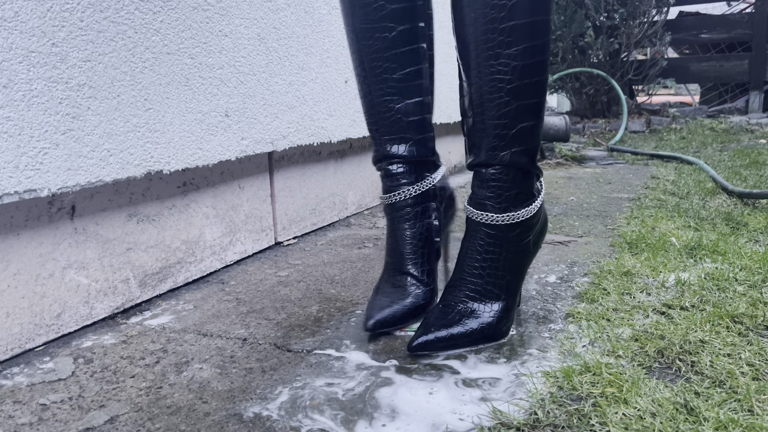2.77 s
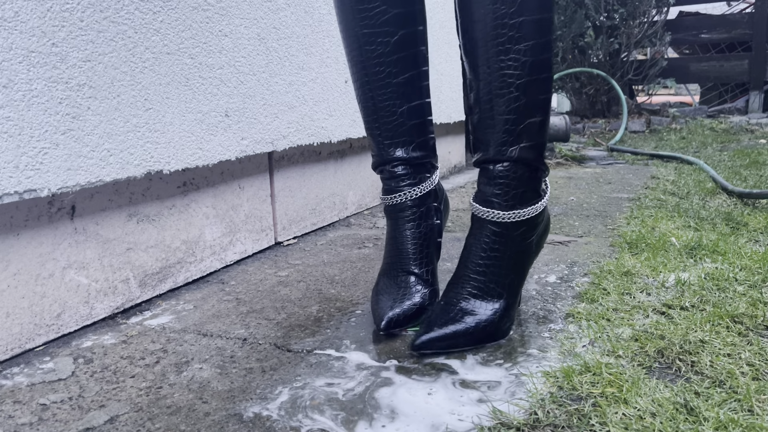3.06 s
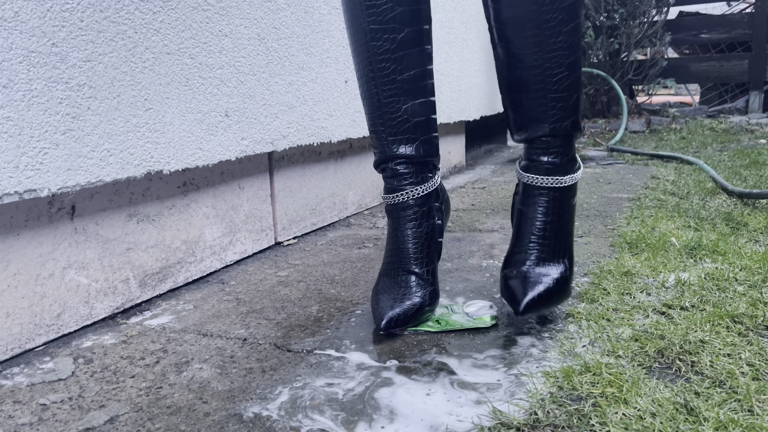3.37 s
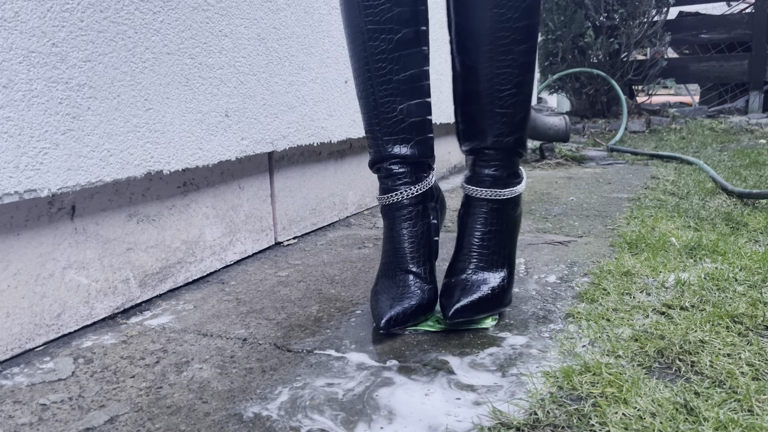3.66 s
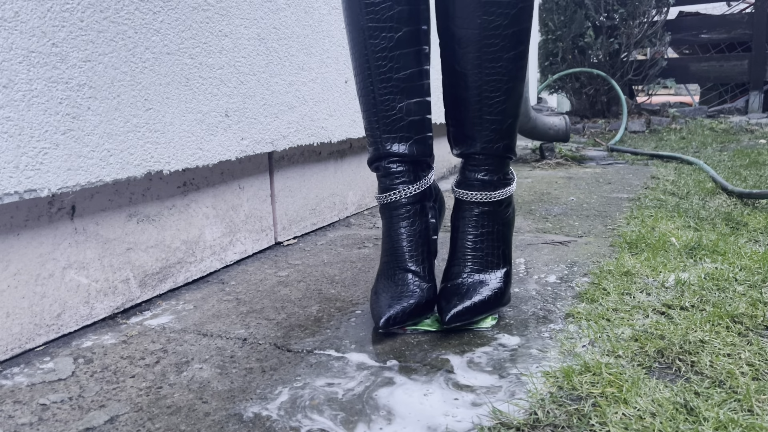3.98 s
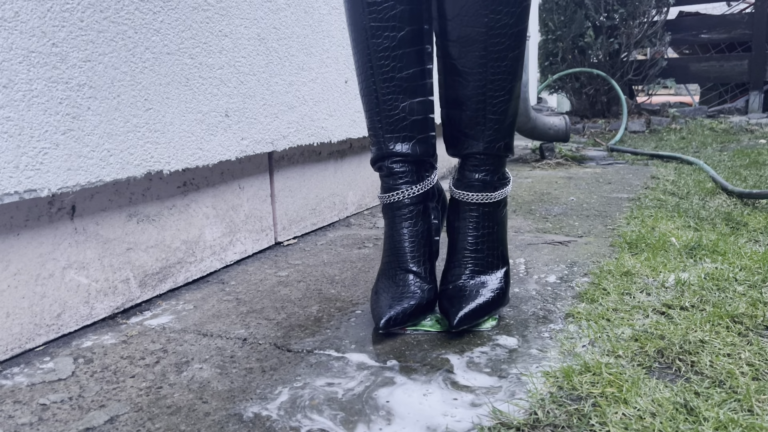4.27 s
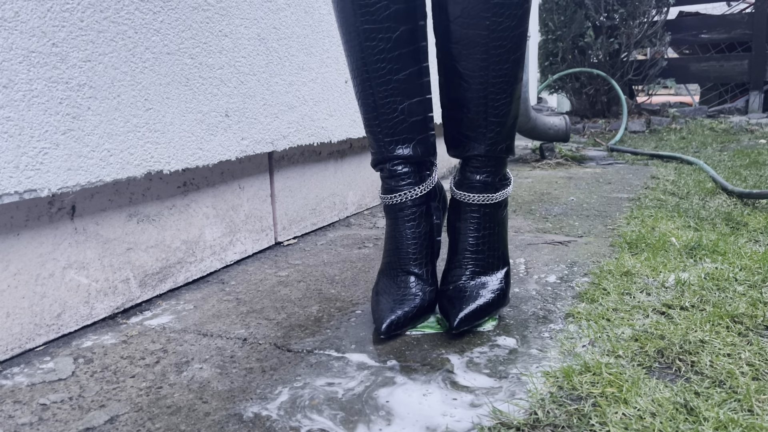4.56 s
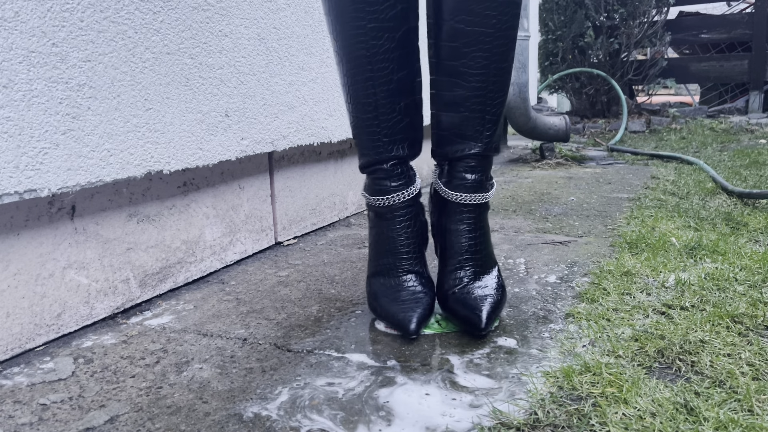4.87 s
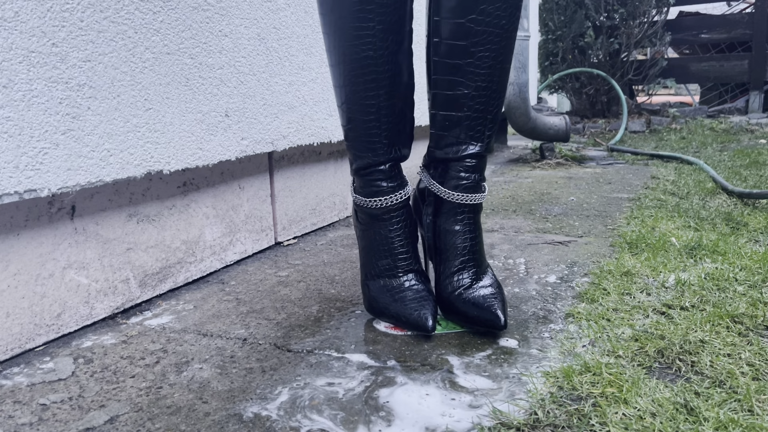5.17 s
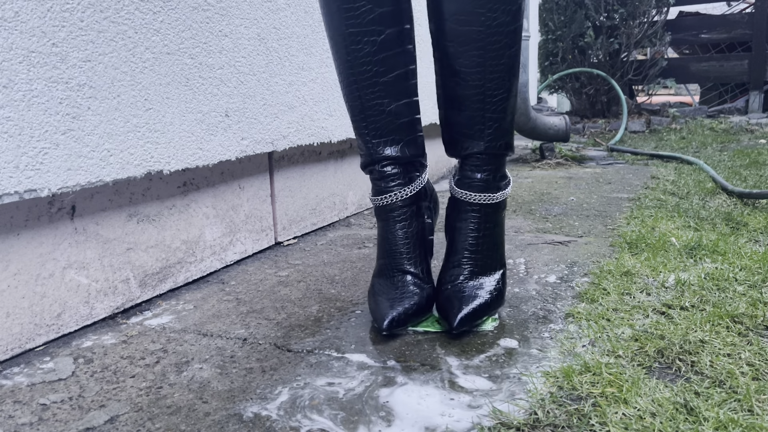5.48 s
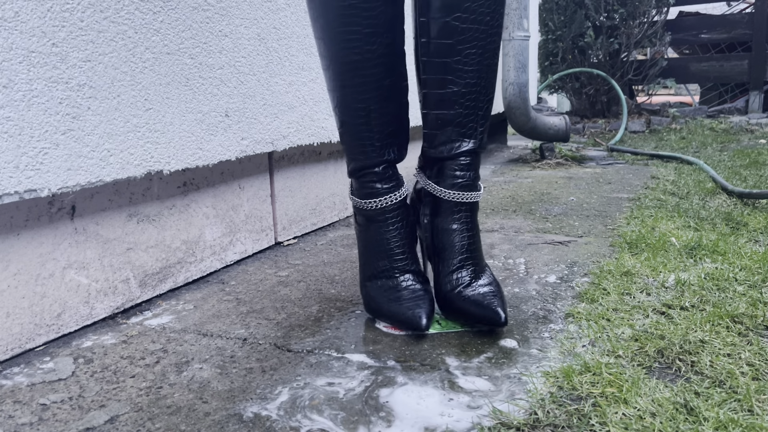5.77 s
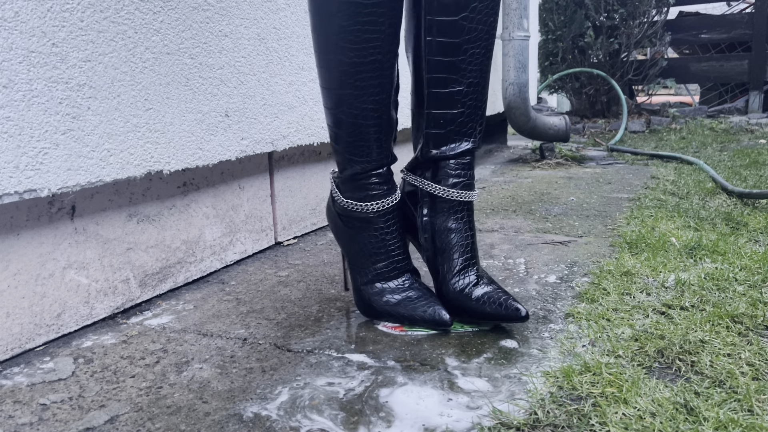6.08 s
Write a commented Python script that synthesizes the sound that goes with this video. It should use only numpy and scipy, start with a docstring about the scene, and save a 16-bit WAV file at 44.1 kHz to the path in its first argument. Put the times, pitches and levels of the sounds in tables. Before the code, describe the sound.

Busy metallic crunches and crackles of a thin can underfoot on wet ground thin out into sparse clicks and faint scrapes over low outdoor rumble.

```python
"""Concrete ground beside a house wall: high-heeled boots tread a flattened thin metal can into the wet.
Decaying sine modes and noise bursts make the snaps of the buckling sheet; damped sines make the knocks.
Shaped, grainy noise makes the crumpling, the scrape over wet grit, the rasp of slips and the foam's fizz.
Noise rumble and a wavering low rush lie below; noise tails answer the hits; a two-port microphone listens."""
import sys
import numpy as np
from scipy import signal
from scipy.fft import rfft, irfft, next_fast_len
from scipy.io import wavfile
from scipy.ndimage import uniform_filter1d, map_coordinates

SR = 44100
rng = np.random.default_rng(int(sys.argv[2]) if len(sys.argv) > 2 else 0)


def dump_mix(stems):
    """Bounce the given channels to the path in sys.argv[1] as a 16-bit WAV at rate SR."""
    frames = np.atleast_2d(stems).T  # one column per channel
    limited = np.clip(frames, -1, 1)  # hard clip at full scale
    pcm = np.round(limited * 32767).astype(np.int16)
    wavfile.write(sys.argv[1], SR, pcm)


N = 274743


def amp(db):
    """Decibels to gain."""
    return 10 ** (np.asarray(db) / 20)


def unit(x):
    """x at rms 1."""
    return x / np.sqrt(np.mean(x ** 2) + 1e-20)


def along(points, hz):
    """Second column of points, interpolated over log frequency."""
    point_hz, value = np.transpose(points)
    return np.interp(np.log(hz + 1), np.log(point_hz + 1), value)


def curves(rows):
    """One value per sample for each column after the time."""
    time_s, *columns = np.transpose(rows)
    return [np.interp(np.arange(N) / SR, time_s, column) for column in columns]


def wobble(rate_hz):
    """Smooth random curve with rate_hz knots a second."""
    knots = rng.standard_normal(int(N * rate_hz / SR) + 4)
    return map_coordinates(knots, [np.arange(N) * rate_hz / SR])


def filtered(x, response):
    """x times a complex response of frequency."""
    n = x.shape[-1]
    size = next_fast_len(n + SR // 4)
    spectrum = rfft(x, size) * response(np.fft.rfftfreq(size, 1 / SR))
    return irfft(spectrum, size)[..., :n]


def causal(spectrum, size=1024):
    """Minimum-phase impulse response of a spectrum, by folding its cepstrum."""
    level_db = along(spectrum, np.fft.rfftfreq(size, 1 / SR))
    cepstrum = irfft(np.log(amp(level_db)))
    cepstrum[1:size // 2] *= 2
    cepstrum[size // 2 + 1:] = 0
    return irfft(np.exp(rfft(cepstrum)))


# left-right likeness: (frequency [Hz], correlation [0-1])
LIKENESS = [(40, .99), (120, .96), (250, .68), (600, .25), (1000, .2), (5000, .55), (8000, .97), (9300, 1)]


def spread(pair):
    """Two unrelated signals become left and right, alike by frequency."""
    def mid_side_gains(hz):
        turn_rad = np.arccos(np.clip(along(LIKENESS, hz), 0, 1)) / 2
        return np.array([np.cos(turn_rad), np.sin(turn_rad)])

    mid, side = filtered(pair, mid_side_gains)
    return np.array([mid + side, mid - side])


def noise(spectrum, grain_db=0, grain_hz=100):
    """Stereo noise of rms 1; a random level of deviation grain_db clumps it into grains."""
    pair = rng.standard_normal((2, N)) * amp(grain_db * wobble(grain_hz))
    return unit(spread(filtered(pair, lambda hz: amp(along(spectrum, hz)))))


def swept(x, path, peak_db, octaves, patchy_db):
    """x through a broad resonance that follows path, with small random patches."""
    hz, frame_s, z = signal.stft(x, SR, nperseg=1024)
    centre_hz = np.interp(frame_s, *np.transpose(path))
    away = np.log2((hz[:, None] + 1) / centre_hz) / octaves
    patches = uniform_filter1d(rng.standard_normal(z.shape[1:]), 3, 0)
    patches = unit(uniform_filter1d(patches, 7, 1))
    coloured = z * amp(peak_db / (1 + away ** 2) + patchy_db * patches)

    def slow_power(v):
        return uniform_filter1d(np.sum(np.abs(v) ** 2, axis=(0, 1)), 15)

    # the colour moves, the slow level stays
    coloured *= np.sqrt(slow_power(z) / slow_power(coloured))
    return signal.istft(coloured, SR, nperseg=1024)[1][:, :N]


def add(track, time_s, sound):
    """Mix a sound into the track at time_s."""
    room = track[max(0, round(time_s * SR)):][:len(sound)]
    room += sound[:len(room)]


# rumble spectrum: (frequency [Hz], relative density [dB])
RUMBLE = [(15, -43.5), (28, -33), (45, -3), (70, 2.5), (105, 1.5), (140, -10), (200, -15.5), (400, -58)]
# low rush spectrum: (frequency [Hz], relative density [dB])
RUSH = [(90, -20.5), (160, -1), (240, -2), (320, -10), (450, -11.5), (620, -25), (1200, -42), (4000, -63.5)]
# rush resonance: (time [s], centre [Hz])
RUSH_COLOUR = [(0, 168), (1.3, 201.6), (1.75, 408), (2.3, 262), (2.9, 343), (3.4, 420), (4.0, 384),
               (4.3, 189.5), (4.9, 289.6), (5.1, 247), (5.6, 190)]
# rush swell, before rush_trim_db: (time [s], level [dB])
RUSH_LEVEL = [(0, -61.5), (.45, -59), (.75, -59.5), (1.28, -60.5), (1.7, -54.5), (2.25, -57.5),
              (2.62, -57.5), (2.87, -54.5), (3.12, -60.5), (3.4, -54.5), (3.6, -60), (3.92, -54),
              (4.75, -57.5), (5.05, -50), (5.35, -59), (6.23, -57)]


def air(rumble_db=-49, drift_db=0.26, rush_trim_db=3):
    """Distant rumble that drifts a little, and a low rush that swells, sinks and wavers in colour."""
    rumble = amp(rumble_db + drift_db * wobble(4)) * noise(RUMBLE)
    rush_db, = curves(RUSH_LEVEL)
    rush = swept(noise(RUSH), RUSH_COLOUR, peak_db=3.5, octaves=0.26, patchy_db=2.22)
    return rumble + amp(rush_db + rush_trim_db) * rush


# far decay of the yard: (frequency [Hz], t60 [s])
YARD_T60 = [(100, 0.24), (500, 0.18), (1500, 0.27), (5000, 0.32), (12000, .2)]


def yard(hits, near_db=-13, near_t60_s=0.057, far_db=-15, stretches=12):
    """Ground and wall scatter hits at once, the yard answers longer; each stretch draws new paths."""
    wet, t = np.zeros((2, N)), np.arange(SR // 3) / SR
    for stretch in np.array_split(np.arange(N), stretches):
        hz, age_s, z = signal.stft(rng.standard_normal((2, len(t))), SR, nperseg=256)
        z = z * amp(-60 * age_s / along(YARD_T60, hz)[:, None])
        far = signal.istft(z, SR, nperseg=256)[1][:, :len(t)]
        near = rng.standard_normal((2, len(t))) * amp(-60 * t / near_t60_s)
        both = amp(near_db) * unit(near) + amp(far_db) * unit(far)
        tail = spread(both / np.sqrt(len(t)))
        answers = signal.fftconvolve(hits[stretch][None], tail, axes=1)
        for side, answer in zip(wet, answers):
            add(side, stretch[0] / SR + .001, answer)
    return wet


# can gives way, before grinding trims:
# (time [s], crumple [dB], scrape [dB], wet fizz [dB], build-up [s])
CRUSHES = [(.472, -47, -53, -50.5, .008), (.548, -57, -51.5, -45.5, .018), (1.0, -41.5, -45.5, -47, .025),
           (1.412, -39, -43.5, -46, .014), (1.785, -54, -56, -53, .02), (1.59, -55, -71, -69, .008),
           (1.912, -44, -61, -54, .008), (2.03, -51, -56, -57.5, .018), (2.225, -38.5, -45, -53.5, .014),
           (2.28, -39, -42.5, -47, .014), (2.465, -45, -42.5, -53.5, .025), (3.176, -53, -63, -78, .01),
           (3.695, -41, -47, -46, .005), (4.53, -53, -55, -74, .011), (5.705, -61.5, -62, -61, .03)]
CRUSH_DB_PER_S = 301  # fall of the crunch
# lingering crumple, scrape and fizz, relative to the crush [dB]; their fall
SETTLE_DB, SETTLE_DB_PER_S = [-26.5, -29, -21.5], 60
# sole swivels, before grinding trims: (time [s], scrape [dB], wet fizz [dB], half length [s])
RUBS = [(0.037, -68, -68, .06), (0.189, -79, -70, .08), (.64, -59, -60, .045), (0.879, -75, -71, .06),
        (1.185, -77, -62, .07), (1.499, -64, -74, .035), (1.72, -70, -73, .03), (2.179, -66, -66, .03),
        (2.37, -61, -62, .035), (2.782, -68, -65, .06), (2.921, -76, -79, .04), (3.178, -70, -71.5, .06),
        (3.401, -78, -76, .1), (3.83, -63, -58, .04), (4.05, -73, -75, .12), (4.601, -68, -68.5, .03),
        (4.784, -72, -65.5, .04), (4.97, -63, -62, .055), (5.465, -60, -59.5, .04), (5.791, -67, -70, .055),
        (5.983, -63, -64.5, .05), (6.177, -61, -66, .018)]
RUB_CRUMPLE_DB = 1  # relative to the rub's scrape
# standing weight, before grinding trims: (crumple [dB], scrape [dB], fizz [dB])
REST_DB = [-70, -76, -76]


def effort():
    """Gains of crumple, scrape and fizz: a crush builds, collapses and settles; a rub swells and fades."""
    t = np.arange(N) / SR
    power = np.outer(amp(REST_DB) ** 2, np.ones(N))
    for time_s, crumple_db, scrape_db, fizz_db, rise_s in CRUSHES:
        build = np.exp(-(np.minimum(t - time_s, 0) / rise_s) ** 2)
        age_s = np.maximum(t - time_s, 0)
        peak = amp([crumple_db, scrape_db, fizz_db])
        power += np.outer(peak ** 2, build * amp(-CRUSH_DB_PER_S * age_s) ** 2)
        settled = peak * amp(SETTLE_DB)
        power += np.outer(settled ** 2, build * amp(-SETTLE_DB_PER_S * age_s) ** 2)
    for time_s, scrape_db, fizz_db, half_s in RUBS:
        peak = amp([scrape_db + RUB_CRUMPLE_DB, scrape_db, fizz_db])
        power += np.outer(peak ** 2, np.exp(-((t - time_s) / half_s) ** 2))
    return np.sqrt(power)


# fold spectrum: (frequency [Hz], relative density [dB])
CRUMPLE = [(150, -37.5), (400, 3), (700, -1.5), (1200, -4.5), (1800, -13), (3000, -25), (6000, -65)]
# metal on grit spectrum: (frequency [Hz], relative density [dB])
SCRAPE = [(900, -33.5), (1800, 2), (2800, -1.5), (4200, -1.5), (6000, -3.5), (7500, -8), (11000, -36)]
# foam spectrum: (frequency [Hz], relative density [dB])
FIZZ = [(4000, -36), (6800, -6.5), (8500, 0), (10600, 9), (11700, -8.5), (12500, -30), (13300, -41),
        (16000, -41)]
# scrape resonance, moving with the contact: (time [s], centre [Hz])
CONTACT = [(.6, 5000), (1.0, 2970), (1.421, 2200), (1.678, 4000), (2.26, 2400), (4.55, 2540), (5.46, 2820),
           (6.0, 3600)]


def grinding(crumple, scrape, fizz, crumple_trim_db=-1.0, scrape_trim_db=-3.5, fizz_trim_db=-1):
    """Tiny folds crumple, metal scrapes over grit, soapy water squeezes out: three grainy noises."""
    folds = noise(CRUMPLE, grain_db=2, grain_hz=370)
    grains = noise(SCRAPE, grain_db=2.5, grain_hz=380)
    grit = swept(grains, CONTACT, peak_db=5.5, octaves=0.69, patchy_db=3.5)
    foam = noise(FIZZ, grain_db=3.0, grain_hz=2500)
    ground = crumple * amp(crumple_trim_db) * folds + scrape * amp(scrape_trim_db) * grit
    return ground + fizz * amp(fizz_trim_db) * foam


# sole slips over the metal: (time [s], rms at centre [dB], pitch [Hz], half length [s])
SLIPS = [(2.31, -39.5, 2500, 0.017), (5.459, -64.5, 2840, 0.044), (6.006, -61.5, 3640, 0.05),
         (6.162, -67.5, 3640, 0.026)]


def slips(width_hz=750, grain_db=4):
    """Fine stick-slip grains excite one resonance while the sole slides: a narrow rasp."""
    track, t = np.zeros((2, N)), np.arange(N) / SR
    for time_s, level_db, pitch_hz, half_s in SLIPS:
        grains = rng.standard_normal((2, N)) * amp(grain_db * wobble(300))
        rasp = filtered(grains, lambda hz: 1 / (1 + ((hz - pitch_hz) / width_hz) ** 2))
        swell = np.exp(-((t - time_s) / half_s) ** 2 / 2)
        track += unit(rasp) * amp(level_db) * swell
    return spread(track)


def crinkles(crumple, count=330, level_db=-54, scatter_db=5, crowding=.85, growth=0.57,
             low_hz=900, octaves=1.6, cycles=3.3):
    """Small folds tick at random, more often and louder the harder the sheet is crumpled."""
    track, t = np.zeros(N), np.arange(SR // 100) / SR
    load = crumple / amp(REST_DB[0])
    due = np.cumsum(load ** crowding)
    for when, pitch, size in rng.uniform(size=(count, 3)):
        at = np.searchsorted(due, when * due[-1])
        hz = low_hz * 2 ** (octaves * pitch)
        tick_db = level_db + scatter_db * (2 * size - 1)
        tick = amp(tick_db - 60 * t * hz / cycles) * np.sin(2 * np.pi * hz * t)
        add(track, at / SR, load[at] ** growth * tick)
    return track


# sole or heel on concrete or can: (time [s], level before attack [dB], pitch [Hz], t60 [s])
THUDS = [(.459, -30, 536, 0.042), (0.473, -28.5, 219, 0.022), (0.647, -43.5, 972, 0.1),
         (1.018, -33, 283, 0.034), (1.424, -29, 230, 0.051), (1.426, -26, 121.6, 0.068),
         (1.583, -35, 1015, 0.032), (1.901, -38.5, 643, 0.1), (2.024, -32.5, 416, 0.041),
         (2.208, -25, 258, 0.018), (2.2091, -20.5, 500, 0.028), (2.22, -28, 119, 0.056),
         (2.269, -26.5, 105, 0.094), (3.169, -41, 640, 0.056), (3.687, -37.5, 526, 0.017),
         (3.692, -25, 170, 0.031), (3.713, -25.5, 108, 0.056), (5.857, -33.5, 406, 0.021)]


def thuds(attack_s=0.00042):
    """The boot bottoms out: a short, dull knock from one damped sine."""
    track, t = np.zeros(N), np.arange(SR // 5) / SR
    for time_s, level_db, hz, t60_s in THUDS:
        knock = amp(level_db - 60 * t / t60_s) * np.sin(2 * np.pi * hz * t)
        add(track, time_s, knock * (1 - np.exp(-t / attack_s)))
    return track


# sheet buckles, levels as rms over SNAP_S:
# (time [s], panel pitch [Hz], panel pop [dB], crease crack [dB], grit tick [dB])
SNAPS = [(0.455, 550, -41, -55, -81), (0.4606, 1100, -38, -46.5, -72), (.4663, 1610, -36, -46, -43),
         (0.5258, 950, -56, -54, -73), (0.5359, 940, -37, -36, -41), (0.5399, 1420, -47, -37, -40),
         (0.6461, 1200, -42, -47, -51), (0.7237, 1710, -61, -56, -47.5), (0.9676, 1130, -46, -55, -63),
         (.978, 1900, -32.5, -34.5, -31), (0.9877, 1100, -39, -53, -51.5), (.9978, 1050, -38, -57, -51),
         (1.019, 910, -30, -40, -43), (1.371, 1830, -40.5, -41.5, -67), (1.3765, 1340, -41, -40.5, -48.5),
         (1.3903, 1180, -38.5, -41.5, -58), (1.4037, 1600, -37, -46, -55),
         (1.4073, 1780, -32.5, -37.5, -42.5), (1.4169, 1090, -39, -42, -54), (1.4124, 1770, -36, -48, -48),
         (1.4506, 1100, -45.5, -57, -58), (1.4681, 960, -45.5, -48, -43.5), (1.5724, 1180, -50, -57, -62),
         (1.5832, 930, -42, -55, -66), (1.6531, 1760, -45.5, -32, -43), (1.7528, 1110, -50, -65, -64),
         (1.7727, 1140, -43, -51, -41.5), (1.852, 590, -49, -85, -79), (1.8992, 760, -36, -47, -43),
         (2.0212, 822, -39.5, -48, -58), (2.1143, 1860, -56.5, -61, -62.5), (2.195, 656, -43.5, -60, -66),
         (2.2166, 1170, -24.5, -45, -53), (2.2576, 1500, -36, -38.5, -41.5), (2.2603, 973, -49, -44, -42),
         (2.362, 1310, -49.5, -72, -66), (2.3911, 1120, -43, -48.5, -53), (2.4233, 1620, -30, -44, -45.5),
         (2.6039, 944, -56.5, -84, -88), (2.7051, 1210, -53, -55.5, -53.5), (2.757, 1000, -53, -70, -88),
         (3.126, 940, -50.5, -65.5, -78), (3.164, 1108, -29.5, -41.5, -61), (3.1664, 1390, -36.5, -51, -71),
         (3.681, 1230, -36, -55, -57), (3.6855, 1770, -41, -32, -20), (3.7647, 1000, -50, -61, -60.5),
         (3.7964, 1870, -39.5, -49.5, -52.5), (3.8667, 1440, -65, -59.5, -44.5),
         (3.9131, 500, -65, -59, -57), (3.9423, 685, -59.5, -61.5, -84.5), (4.122, 840, -72, -69.5, -52),
         (4.5195, 1290, -34, -43, -60), (4.64, 1180, -56.5, -86, -72.5), (4.6962, 1640, -34.5, -47, -49.5),
         (4.8925, 1200, -58.5, -72, -82), (5.1532, 1460, -63, -75.5, -70), (5.337, 1700, -41, -58, -86),
         (5.68, 1370, -57, -53, -42), (5.6849, 1570, -44.5, -58, -79), (5.703, 1455, -38.5, -46, -49.5),
         (5.8809, 1335, -54, -86, -83), (6.2048, 1330, -48, -51.5, -51)]
SNAP_S = .005
# crease spectrum before the hardness shift: (frequency [Hz], relative level [dB])
CRACK = [(1100, -47.5), (2300, -9), (3100, -4), (4600, -2), (6000, -8), (7400, -16.5), (13000, -51.5)]
# grit spectrum: (frequency [Hz], relative level [dB])
TICK = [(4500, -18.5), (6800, -13), (8200, 0), (9700, 1.5), (11000, 4.5), (12500, -14), (14000, -20.5),
        (16000, -28)]


def snaps(pop_cycles=2.1, crack_t60_s=0.0075, tick_t60_s=.0025, rebound=.5, crack_rebound=0.34,
          splinter=1.0, hardening_oct_per_db=0.011, low_hz=340, high_hz=2900):
    """A panel flips and rings about two cycles under the sole; its crease cracks, grit ticks on it."""
    track, t = np.zeros(N), np.arange(SR // 40) / SR
    highpass = signal.butter(2, low_hz, "high", fs=SR, output="sos")
    lowpass = signal.butter(4, high_hz, fs=SR, output="sos")
    band = np.vstack([highpass, lowpass])

    def sized(v, level_db):
        return amp(level_db) * v * np.sqrt(SNAP_S * SR / np.sum(v ** 2))

    def splinters(t60_s):
        return splinter * rng.standard_normal(len(t)) * amp(-60 * t / t60_s)

    def mode(hz):
        return np.sin(2 * np.pi * hz * t) * amp(-60 * t * hz / pop_cycles)

    for time_s, hz, pop_db, crack_db, tick_db in SNAPS:
        # new side modes at every fold; the neighbouring fold gives way lag_s later
        lower, upper, lag_s = rng.uniform([.47, 1.45, .0013], [.62, 1.8, .002])

        def later(v):
            return np.interp(t - lag_s, t, v, left=0)

        modes = mode(hz) - 0.31 * mode(hz * lower) - 0.76 * mode(hz * upper)
        ring = signal.sosfilt(band, modes)
        add(track, time_s, sized(ring + rebound * later(ring), pop_db))
        # a hard, gritty contact cracks higher than a soft one
        shift = 2 ** np.clip(hardening_oct_per_db * (tick_db - crack_db), -.4, .5)
        crack = [(crack_hz * shift, db) for crack_hz, db in CRACK]
        for spectrum, t60_s, db in (crack, crack_t60_s, crack_db), (TICK, tick_t60_s, tick_db):
            # a clean break, then splinters
            burst = (t == 0) + splinters(t60_s) + crack_rebound * later(splinters(t60_s))
            shaped = signal.fftconvolve(burst, causal(spectrum))[:len(t)]
            add(track, time_s, sized(shaped, db))
    return track


# modes of the whole flattened sheet: (frequency [Hz], relative level [dB], t60 [s])
SHEET = [(560, 8.5, 0.024), (660.5, -1, .08), (1015, -1.5, .08), (1390, -10, 0.033)]


def sheet(pops, ring_db=-49):
    """Pops near a mode of the whole sheet leave a short hollow ring."""
    t = np.arange(SR // 4) / SR
    modes = sum(amp(db - 60 * t / t60_s) * np.cos(2 * np.pi * hz * t) for hz, db, t60_s in SHEET)
    return pops + amp(ring_db) * signal.fftconvolve(pops, modes)[:N]


def scene():
    """The can and boots in the yard, over the outdoor air."""
    crumple, scrape, fizz = effort()
    hits = sheet(snaps()) + thuds() + crinkles(crumple)
    return air() + yard(hits) + grinding(crumple, scrape, fizz) + slips() + hits


# left port leads right: (frequency [Hz], phase [rad])
PORT_PHASE = [(100, 0), (2000, 0), (3200, .6), (6200, .3), (7300, .9), (8300, .3), (9300, -1.6),
              (10200, -3.14), (11400, -5.1), (12400, -6.9), (14000, -8.5)]
# left minus right: (frequency [Hz], level [dB])
PORT_BALANCE = [(30, .2), (120, 1.4), (500, 2.5), (1500, 1.5), (4500, 2), (9000, 1.3), (10200, 0),
                (12000, -.3)]
# treble roll-off: (frequency [Hz], gain [dB])
MIC = [(12000, -1), (12700, -5.5), (13500, -7.5), (15800, -13)]
TOP_HZ = 15800


def record(dry):
    """Two ports differ in level and, around their treble resonance, in phase; the treble rolls off."""
    half = np.array([[.5], [-.5]])

    def response(hz):
        balance = amp(half * along(PORT_BALANCE, hz))
        phase = np.exp(1j * half * along(PORT_PHASE, hz))
        return balance * phase * amp(along(MIC, hz)) * (hz < TOP_HZ)

    return filtered(dry, response)


dry = scene()
out = record(dry)
dump_mix(out)
```